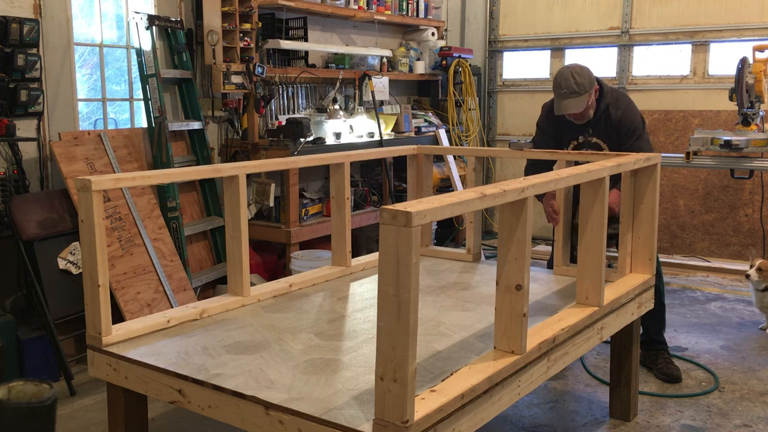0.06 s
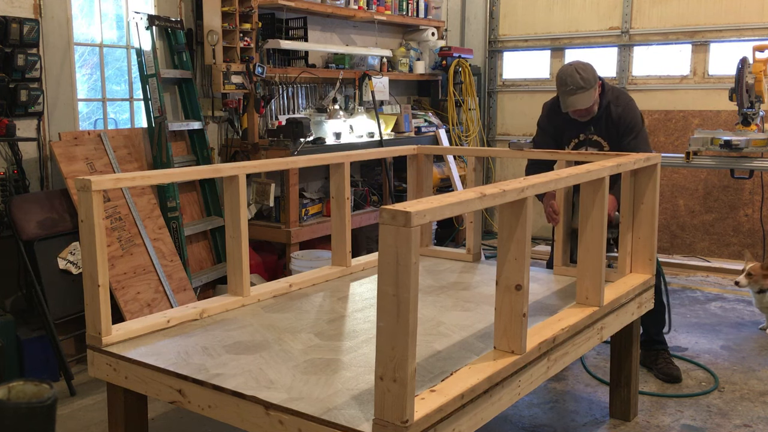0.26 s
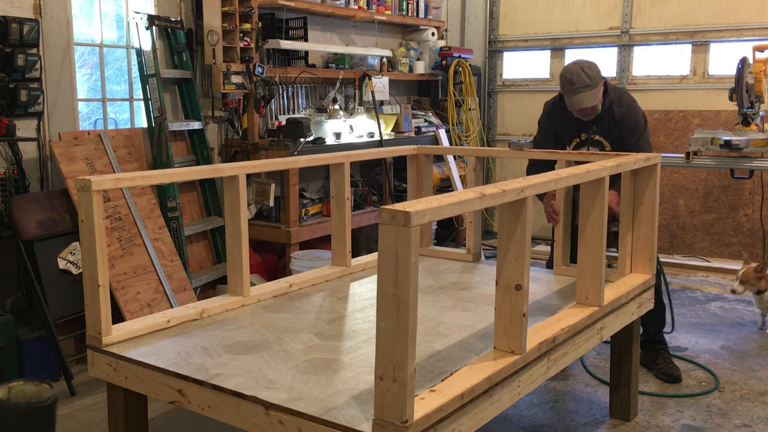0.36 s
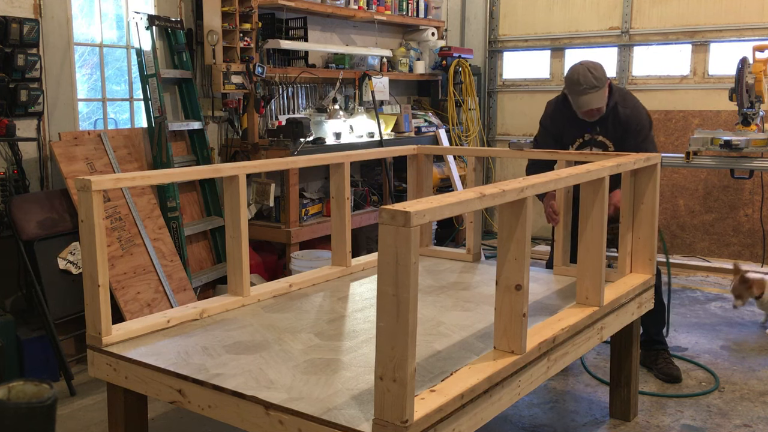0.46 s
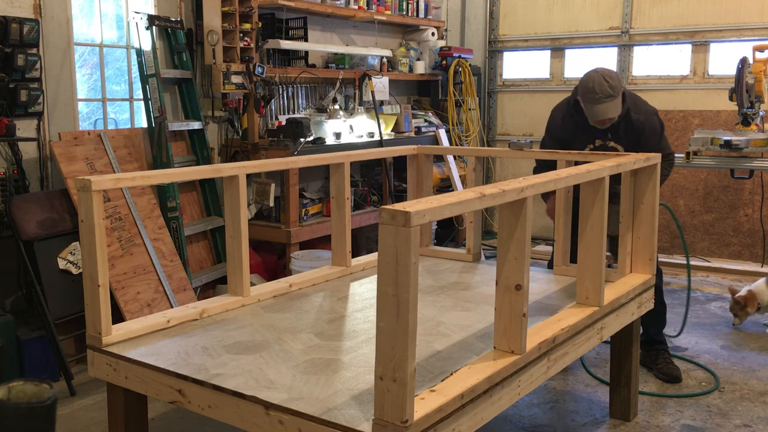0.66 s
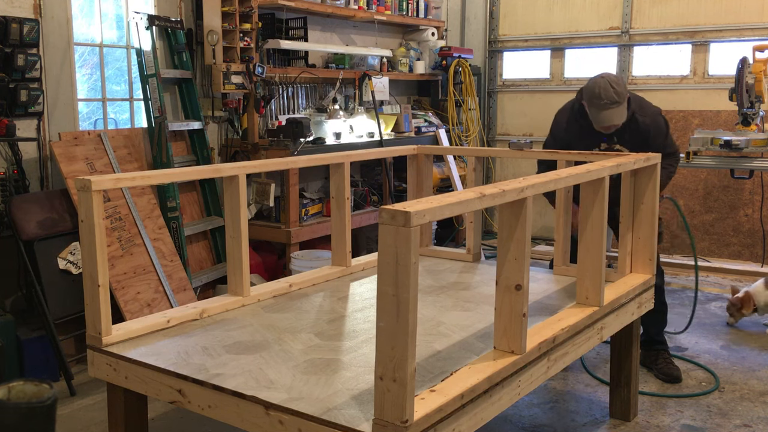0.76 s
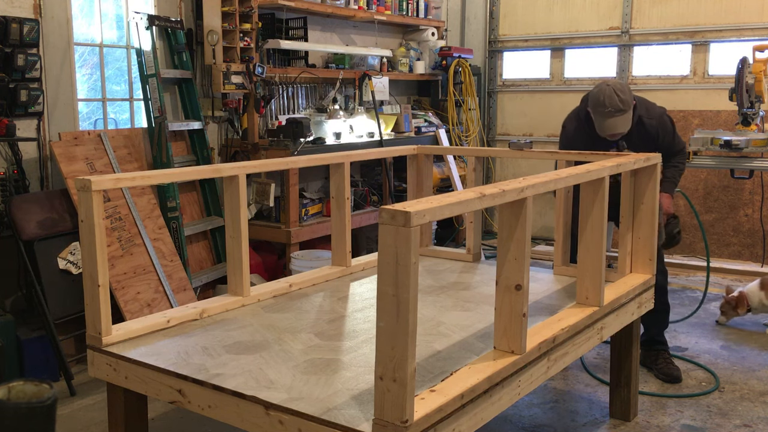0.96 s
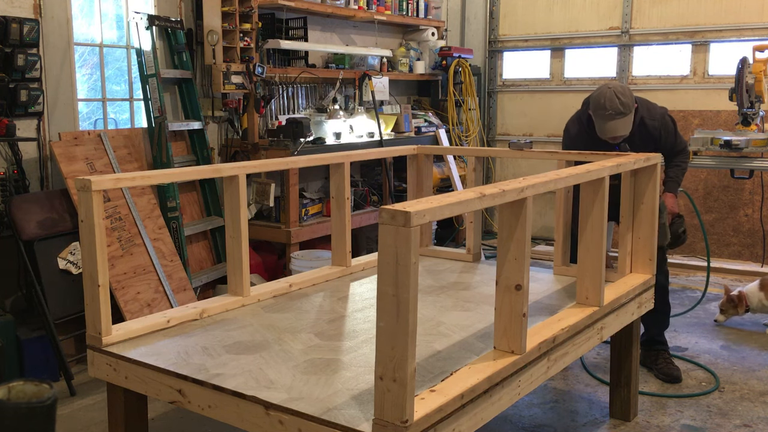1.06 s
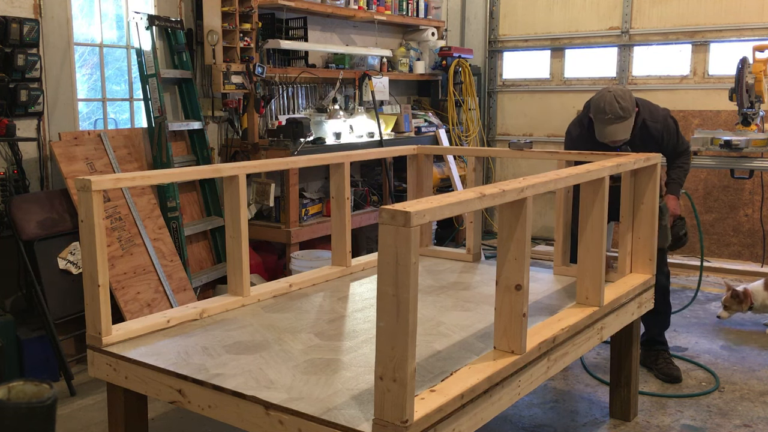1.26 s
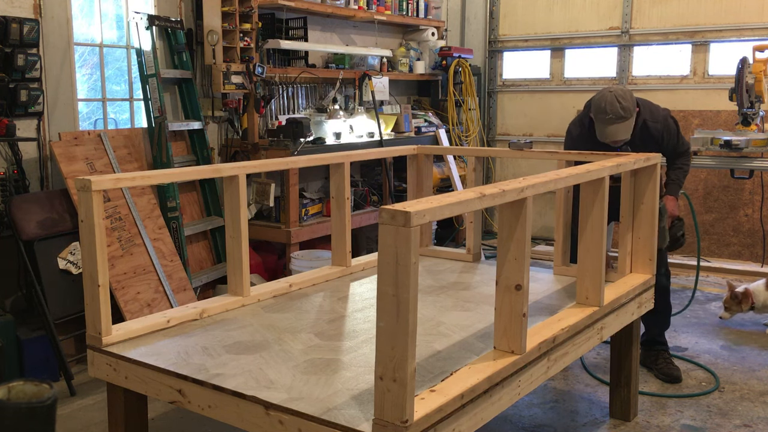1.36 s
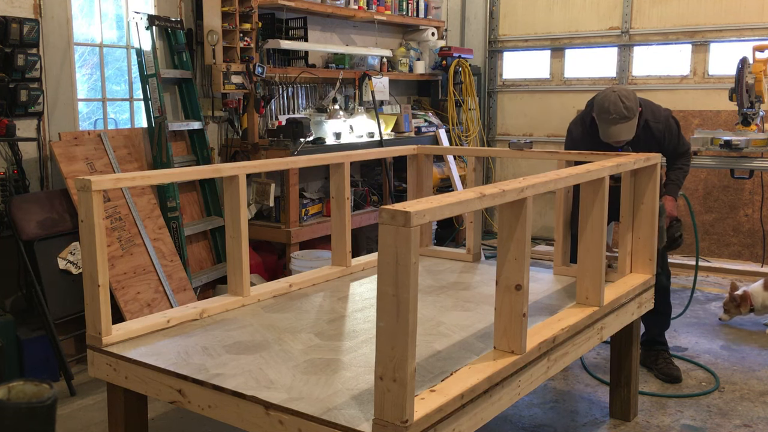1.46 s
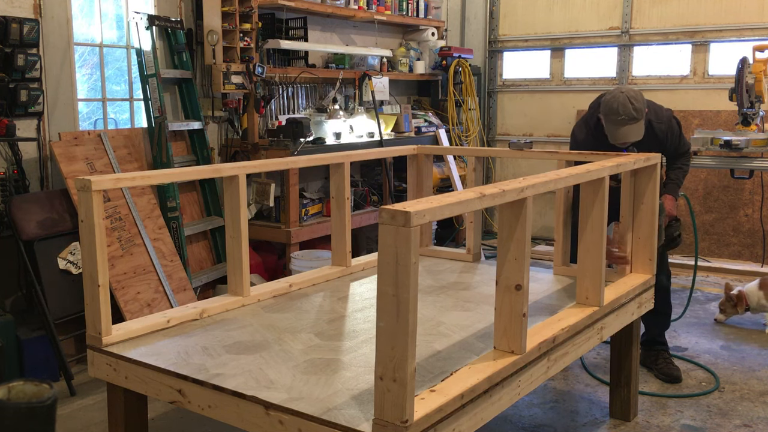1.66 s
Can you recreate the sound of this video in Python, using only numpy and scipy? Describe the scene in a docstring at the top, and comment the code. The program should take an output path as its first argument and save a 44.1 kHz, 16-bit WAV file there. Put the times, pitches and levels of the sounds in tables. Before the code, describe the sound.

In a slightly echoing workshop, an air nailer drives one nail into timber with a sharp crack and air burst, loud enough to overload the microphone. Afterwards the tool is quietly repositioned, with light knocks and scuffs.

```python
"""A pneumatic nailer drives nails into a timber frame; one shot is still dying away as the next fires.
Each shot: the valve snaps, the driver slams the wood, air exhausts, the tool bounces, its steel rings on.
A faint high hiss of air follows as the trigger is released.
Then the tool is set against the frame amid scuffs, soft bench knocks and faint squeaks of the hose.
The workshop rings and hums; the shot overloads the microphone."""
import sys
import numpy as np
from scipy import signal
from scipy.fft import rfft, irfft, next_fast_len
from scipy.io import wavfile

SR = 44100
rng = np.random.default_rng(int(sys.argv[2]) if len(sys.argv) > 2 else 0)


def persist_wave(psi):
    """Save psi, clipped to +-1, as 16-bit WAV."""
    counts = np.round(np.clip(psi, -1, 1) * 32767).astype(np.int16)
    wavfile.write(sys.argv[1], SR, np.atleast_2d(counts).T)


N = 74970
PREROLL_S = .4  # lets the first shot fire early, so only its tail is heard
T = np.arange(-int(PREROLL_S * SR), N) / SR

# trigger pulls (time [s], level [dB])
TRIGGERS = [(-.318, -0.5), (0.2322, 0)]
# hits in a shot: valve, driver, nail head, bounce (delay [s], thud level [dB], contact [ms],
# crack level [dB], crack t60 [s], boom pitch [Hz], boom level [dB], boom length [s])
SHOT_HITS = [(.0003, -27.5, .6, -22, .12, 638, -17, 0.0075), (0.0158, 3, 1.0, -9, .04, 180.3, -5.5, 0.012),
             (0.0272, -2, 0.4, -12, .04, 620, 1.5, .007),
             (0.0906, -16.5, 1.2, -23.5, .03, 460.4, -2, 0.0073)]
# woody body of the frame (pitch [Hz], level [dB], t60 [s])
FRAME_MODES = [(135, -24, 0.058), (163, -17.5, .07), (233.6, -10, 0.16), (265, -15.5, .14),
               (312.4, -16.5, .15), (385.5, -21.5, .25), (445, -20.5, .1), (595, -9, .04),
               (690, -9.5, 0.04), (799, -12, 0.056), (1013, -20.5, 0.44), (1053.5, -24.5, .3),
               (1330, -18.5, .25)]
# ring of the tool's steel (pitch [Hz], level [dB], t60 [s])
STEEL_MODES = [(2240, -55, 1.1), (2450, -55.5, 1.3), (3590, -29.5, 0.35), (4600, -50, .8), (4960, -29, .3),
               (5725, -46.5, 1.15), (6160, -47, 1.05), (8210, -54, 1), (9100, -53.5, 0.98)]
# standing waves of the room, set off by each shot (pitch [Hz], level [dB], t60 [s])
STANDING_WAVES = [(57.8, -31.5, 1.0), (71, -27, .7)]
# tone of the crack, cylinder blast, exhaust and handling hiss (frequency [Hz], relative level [dB])
CRACK_EQ = [(100, -5), (600, 8), (1500, -1), (2700, -0.5), (4500, 0.5), (8000, -0.5), (12000, -4),
            (16000, -13.5)]
BLAST_EQ = [(60, -16.5), (250, -0.5), (650, 1.5), (1300, 1), (1650, -5.5), (2000, -2), (2800, -5),
            (5000, -6), (14000, -22)]
EXHAUST_EQ = [(30, -3), (120, -4), (350, 5.5), (1000, 3.5), (1350, 1), (1650, -7.5), (2400, -5), (4300, 0),
              (6500, -2.5), (9500, -2), (12500, -8), (16000, -13)]
HANDLING_EQ = [(100, -5.5), (600, 0.5), (1500, -4.5), (3500, -7), (6000, -5.5), (8500, -6.5),
               (12000, -13.5), (16000, -23)]
# a faint high hiss of air as the trigger is released (.59 s); the rest are scuffs of tool, hose and shoes
# (time [s], attack [s], t60 [s], hiss level [dB], rasp pitch [Hz], rasp level [dB])
HANDLING_CUES = [(.08, 0.094, 0.98, -69.5, 4400, -64.5), (.59, .035, .1, -63, 11930, -68),
                 (.992, .002, 0.029, -67, 2890, -71), (1.1, .01, .35, -57, 7504, -64.5),
                 (1.11, 0.0022, 0.028, -59, 1998, -59), (1.137, 0.013, 0.038, -60, 3380, -48.5),
                 (1.18, 0.065, 0.23, -65.5, 7500, -67.5), (1.412, 0.042, 0.14, -57.5, 3988, -63),
                 (1.485, 0.034, .13, -61, 3000, -62.5), (1.53, .04, .5, -69, 5400, -76),
                 (1.625, .04, 0.18, -68.5, 3470, -73)]
# light knocks that shake the bench (time [s], level [dB], contact [ms])
KNOCK_CUES = [(1.1146, -37, 1.18), (1.133, -42, 1.55), (1.152, -42.5, 1.2), (1.68, -54, 2.1)]
# low body of the bench under the frame (pitch [Hz], level [dB], t60 [s])
BENCH_MODES = [(77, -14, .7), (102, -19.5, 0.94), (135.6, -8, .3), (156, -6.5, 0.093), (253, -7, 0.12),
               (322, -8, 0.086), (550, -10, .05), (704, -6.5, .06)]
# shudder of the bench top and its joints (frequency [Hz], relative level [dB])
SHUDDER_EQ = [(50, -8), (140, 2), (300, 1.5), (700, -9), (1000, -18), (1600, -31), (6000, -45)]
# hose squeaks (time [s], length [s], start pitch [Hz], end pitch [Hz], level [dB])
SQUEAK_CUES = [(1.349, .04, 5300, 5100, -73), (1.47, 0.096, 4800, 5595, -69),
               (1.537, 0.161, 5600, 5450, -76)]
# reverb decay of the workshop (frequency [Hz], t60 [s])
REVERB_DECAY = [(60, .8), (150, 0.62), (500, 0.53), (1000, 0.57), (2500, .48), (5000, .45), (8000, 0.4),
                (11000, .31), (15000, .24)]
# room tone (frequency [Hz], relative level [dB])
ROOM_TONE_EQ = [(25, -4.5), (60, 0), (120, -4.5), (300, -5), (700, -12.5), (1500, -23), (4000, -25.5),
                (8000, -28.5), (16000, -39)]
# machine hum (pitch [Hz], level [dB])
HUM_PARTIALS = [(59.5, -76), (334, -73.5), (500.5, -73), (1001, -82.5)]


def amp(db):
    """Decibels to gain."""
    return 10 ** (np.asarray(db) / 20)


def curve_at(hz, points):
    """Read (Hz, value) points on a log-frequency axis."""
    freqs, values = np.array(points).T
    return np.interp(np.log(hz + 1e-6), np.log(freqs), values)


def shaped_noise(gain):
    """Noise of rms 1 whose spectrum follows gain(Hz)."""
    size = next_fast_len(len(T), True)
    spectrum = rfft(rng.standard_normal(size)) * gain(np.fft.rfftfreq(size, 1 / SR))
    noise = irfft(spectrum, size)[:len(T)]
    return noise / np.sqrt(np.mean(noise ** 2))


def eq_noise(eq):
    """Noise of rms 1 coloured by an EQ curve."""
    return shaped_noise(lambda hz: amp(curve_at(hz, eq)))


def envelope(start, attack, hold, t60):
    """Linear attack, hold, exponential release; times in seconds."""
    age = T - start
    return np.clip(age / attack, 0, 1) * amp(-60 * np.maximum(age - attack - hold, 0) / t60)


def ring(start, modes):
    """Decaying modes struck at one moment."""
    age = np.maximum(T - start, 0)
    partials = (amp(db - 60 * age / t60) * np.cos(2 * np.pi * hz * age) for hz, db, t60 in modes)
    return (T >= start) * sum(partials)


def thud(modes, start, db, contact_ms):
    """Wood under a brief push; a longer contact gives a duller thud."""
    lag_ms = np.arange(512) * 1000 / SR
    push = np.sin(np.pi * np.minimum(lag_ms / contact_ms, 1)) ** 2
    return amp(db) * signal.fftconvolve(ring(start, modes), push / push.sum())[:len(T)]


def boom(start, hz, db, length):
    """The punch of a hit: a few heavily damped cycles of the struck part."""
    age = T - start
    swell = np.sin(np.pi * np.clip(age / length, 0, 1) ** .7)
    return amp(db) * swell * np.sin(2 * np.pi * hz * age)


def steel_ring(start, detune_hz=18):
    """The steel rings on in detuned pairs of modes that beat and shimmer."""
    pairs = [(hz + detune_hz * side * rng.random(), db, t60)
             for hz, db, t60 in STEEL_MODES for side in (-1, 1)]
    return ring(start, pairs) / 2


def exhaust(start):
    """The cylinder vents in a sharp blast, with a longer hiss of air just behind."""
    blast = amp(4) * eq_noise(BLAST_EQ) * envelope(start, attack=.003, hold=.0042, t60=.053)
    hiss = amp(-3) * eq_noise(EXHAUST_EQ) * envelope(start + .002, attack=.013, hold=.022, t60=.13)
    return blast + hiss


def nailer_shot(start):
    """Four hits, each a thud, boom and crack, layered with exhaust, steel and the room's low ring."""
    vent_time = start + .032
    out = steel_ring(vent_time) + ring(vent_time, STANDING_WAVES)
    for delay, thud_db, contact_ms, crack_db, crack_t60, boom_hz, boom_db, boom_s in SHOT_HITS:
        hit = start + delay
        out += thud(FRAME_MODES, hit, thud_db, contact_ms)
        out += boom(hit, boom_hz, boom_db, boom_s)
        out += amp(crack_db) * eq_noise(CRACK_EQ) * envelope(hit, .0014, .0016, crack_t60)
    return out + exhaust(vent_time)


def handling_hiss(start, attack, t60, hiss_db, rasp_hz, rasp_db, sharpness=3.28):
    """A scuff, or air as the trigger is released: a broad hiss with one rasping resonance."""
    rasp = shaped_noise(lambda hz: 1 / (1 + 2 * (sharpness * (hz / rasp_hz - 1)) ** 2))
    texture = amp(hiss_db) * eq_noise(HANDLING_EQ) + amp(rasp_db) * rasp
    return texture * envelope(start, attack, 0, t60)


def bench_knock(start, db, contact_ms):
    """A soft knock wakes the bench's low modes and sends a shudder through its top."""
    shudder = amp(db - 11) * eq_noise(SHUDDER_EQ) * envelope(start, attack=.0017, hold=0, t60=.37)
    return thud(BENCH_MODES, start, db, contact_ms) + shudder


def hose_squeak(start, length, from_hz, to_hz, db):
    """The dragged hose gives a thin, unsteady, gliding squeak."""
    progress = np.clip((T - start) / length, 0, 1)
    wobble = 1 + .02 * shaped_noise(lambda hz: 1 / (1 + (hz / 150) ** 2))
    pitch = (from_hz + (to_hz - from_hz) * progress) * wobble
    return amp(db) * np.sin(np.pi * progress) * np.sin(2 * np.pi * np.cumsum(pitch) / SR)


def workshop_reverb(direct, predelay_s=.004, build_s=.021, wet_db=-12):
    """Dense reflections that bloom quickly and lose their treble first."""
    t = np.arange(SR) / SR
    spectrum, hz = rfft(rng.standard_normal(SR)), np.fft.rfftfreq(SR, 1 / SR)
    centres = [centre for centre, _ in REVERB_DECAY]
    tail = 0
    for centre, t60 in REVERB_DECAY:
        band = curve_at(hz, [(f, f == centre) for f in centres])  # crossfades into its neighbours
        tail += irfft(spectrum * band, SR) * amp(-60 * t / t60)
    tail *= np.clip((t - predelay_s) / build_s, 0, 1)
    tail /= np.sqrt(np.sum(tail ** 2))
    return amp(wet_db) * signal.fftconvolve(direct, tail)[:len(direct)]


def room_tone():
    """A quiet bed of room noise with a faint machine hum."""
    hum = sum(amp(db) * np.sin(2 * np.pi * (hz * T + rng.random())) for hz, db in HUM_PARTIALS)
    return amp(-65) * eq_noise(ROOM_TONE_EQ) + hum


def scene():
    """Shots and handling in the workshop, in mono, with the pre-roll trimmed off."""
    direct = sum(amp(db) * nailer_shot(start) for start, db in TRIGGERS)
    direct += sum(handling_hiss(*cue) for cue in HANDLING_CUES)
    direct += sum(bench_knock(*cue) for cue in KNOCK_CUES)
    direct += sum(hose_squeak(*cue) for cue in SQUEAK_CUES)
    return (direct + workshop_reverb(direct) + room_tone())[None, -N:]


def record(dry):
    """The microphone thins the deep bass and soft-clips the loudest peaks; the very top is cut."""
    low_cut_hz, high_cut_hz = 82, 15800
    thin = signal.sosfilt(signal.butter(2, low_cut_hz, "high", fs=SR, output="sos"), dry)
    clipped = thin / (1 + thin ** 6) ** (1 / 6)
    return signal.fftconvolve(clipped, signal.firwin(255, high_cut_hz, fs=SR)[None], mode="same")


dry = scene()
out = record(dry)
persist_wave(out)
```